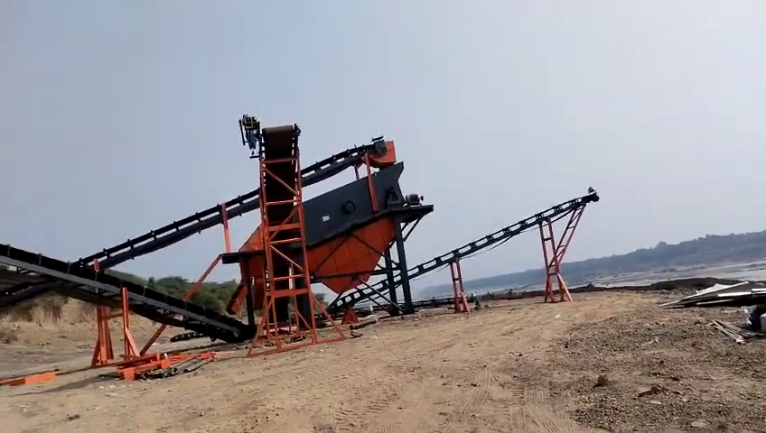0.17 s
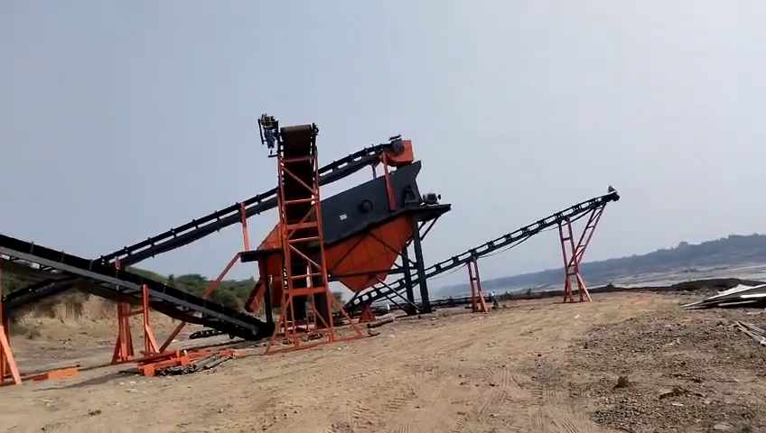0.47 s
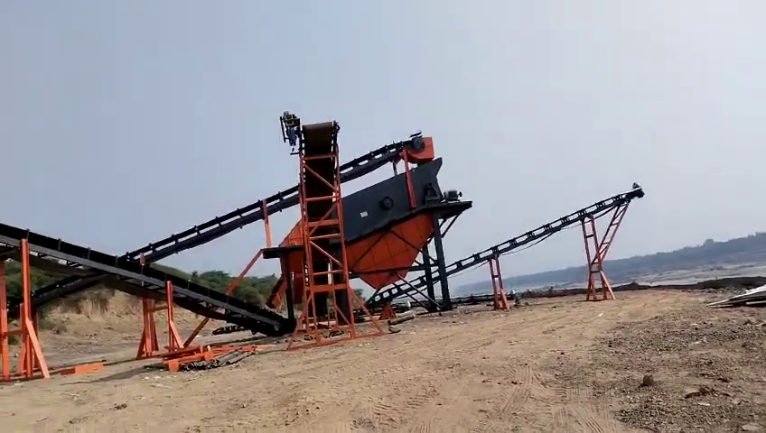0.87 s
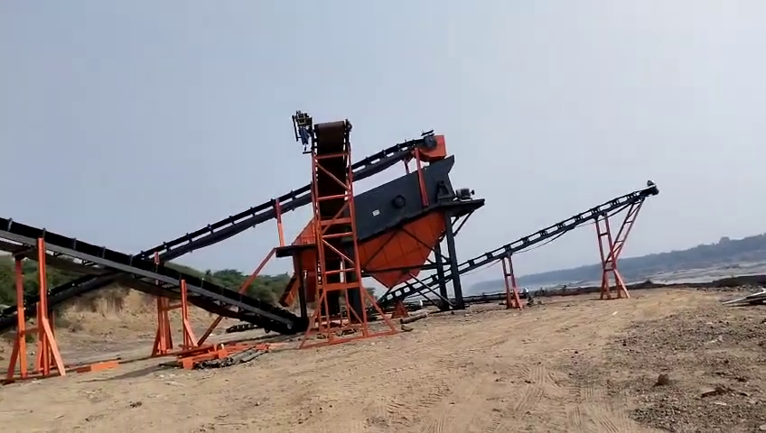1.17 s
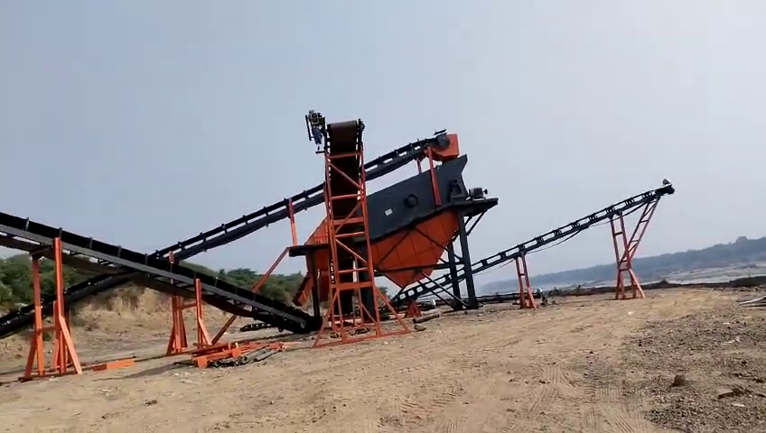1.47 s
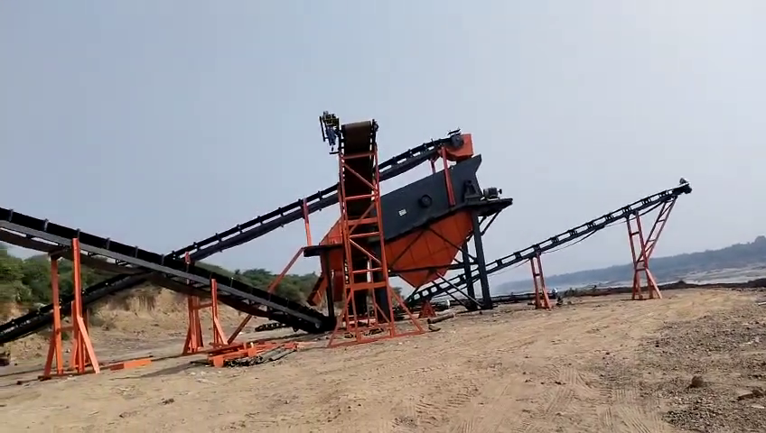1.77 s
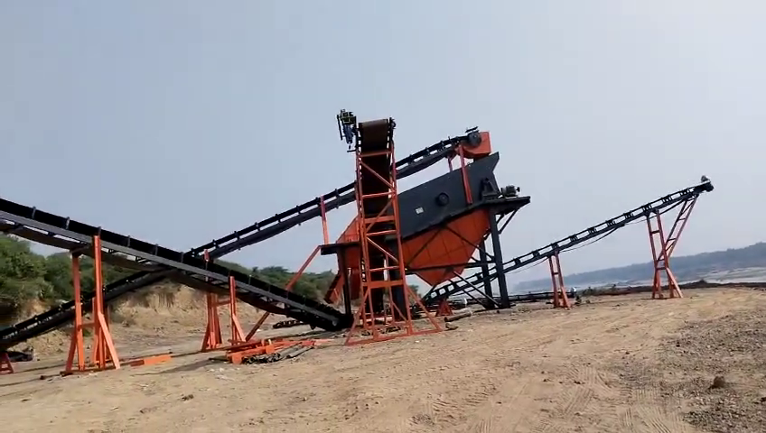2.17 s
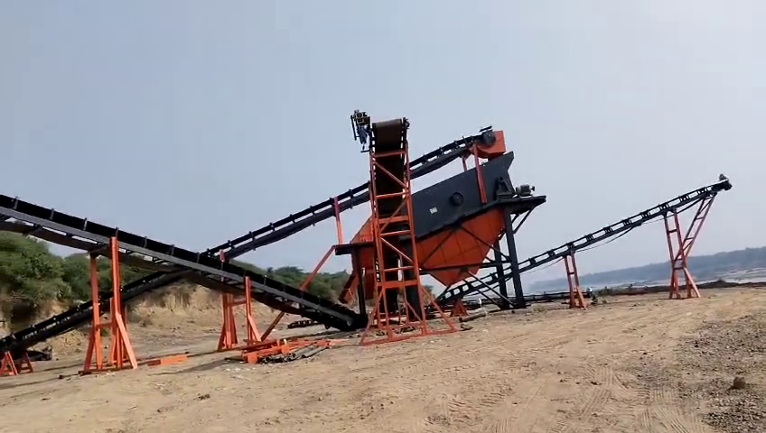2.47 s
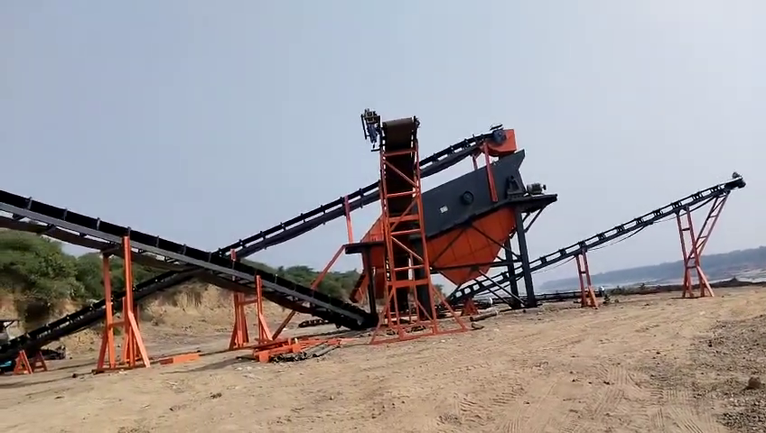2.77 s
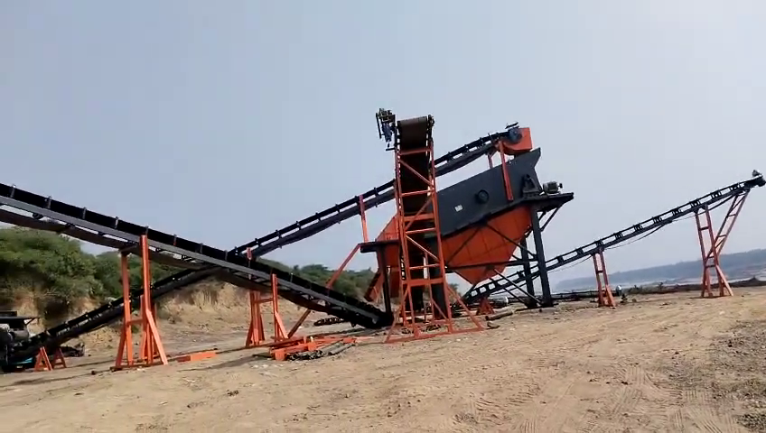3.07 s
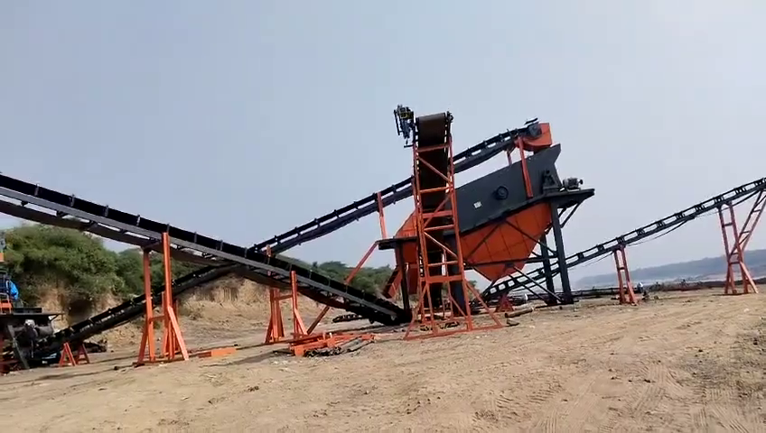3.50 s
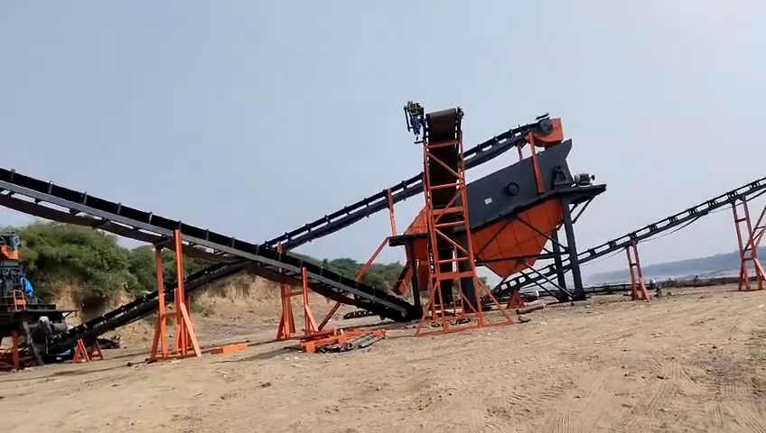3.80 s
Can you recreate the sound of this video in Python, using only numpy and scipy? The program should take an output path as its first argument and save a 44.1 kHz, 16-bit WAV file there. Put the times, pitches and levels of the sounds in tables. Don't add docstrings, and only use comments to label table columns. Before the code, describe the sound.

Steady mechanical roar of a quarry plant across open ground, two engines beating together, metal panels clattering and belts hissing; late on the diesel rises in pitch while a distant hum grows. Stereo handheld phone microphone.

```python
import sys
import numpy as np
from scipy import signal
from scipy.fft import rfft, irfft
from scipy.io import wavfile
from scipy.ndimage import uniform_filter1d

SR = 44100
rng = np.random.default_rng(int(sys.argv[2]) if len(sys.argv) > 2 else 0)


def to_linear_factor(level_db):
    exponent = np.asarray(level_db, float) / 20
    return 10 ** exponent


def bounce(signal):
    frames = np.transpose(np.atleast_2d(signal))
    limited = np.clip(frames, -1, 1)
    pcm = np.round(limited * 32767).astype(np.int16)
    wavfile.write(sys.argv[1], SR, pcm)


N = 173754
T, HZ = np.arange(N) / SR, np.arange(N // 2 + 1) * SR / N
GENERATOR_HZ = 23.655


def table(rows, hz, col=1):
    rows = np.array(rows, float)
    return np.interp(np.log(hz + 1), np.log(rows[:, 0]), rows[:, col])


def walk(rate_hz):
    hold = int(SR / rate_hz)
    steps = np.repeat(rng.standard_normal(N // hold + 1), hold)
    return 1.27 * uniform_filter1d(uniform_filter1d(steps, hold), hold)[:N]


def bandpass(x, order, low_hz, high_hz):
    return signal.sosfilt(signal.butter(order, [low_hz, high_hz], "band", fs=SR, output="sos"), x)


def colour(x, rows, gain=1):
    return irfft(rfft(x) * to_linear_factor(table(rows, HZ)) * np.sqrt(SR / 2) * gain, N)


def line(phase_rad, level_db):
    level = to_linear_factor(level_db + 0.9 * walk(6.08))
    return np.sqrt(2) * level * np.cos(phase_rad + 0.12 * walk(5.25))


def strike(t, rise_s, decay_s):
    return np.exp(-t / decay_s) * (1 - np.exp(-t / rise_s))


def wind():
    x = bandpass(rng.standard_normal((2, N)), 3, 36, 75)
    return to_linear_factor(-44 + 1.7 * walk(4.3)) * x / x.std()


# freq_hz, density_db_per_hz
RUMBLE_SPECTRUM = [(20, -75), (40, -61), (100, -57), (180, -57), (200, -63), (330, -64), (450, -72),
                   (700, -85)]


def ground_rumble():
    return colour(rng.standard_normal(N), RUMBLE_SPECTRUM)


# freq_hz, early_db, late_db
FAR_DRIVE_LINES = [(38.9, -46, -44), (78.5, -49, -41), (129.9, -52, -43), (233.5, -62, -42)]


def far_drive():
    late = T / T[-1]
    return sum(line(2 * np.pi * hz * T, early_db + (late_db - early_db) * late)
               for hz, early_db, late_db in FAR_DRIVE_LINES)


GENERATOR_MULTIPLES = [1, 2, 3, 4, 5, 6, 10, 13]
GENERATOR_LEVELS = [-58, -35, -37.5, -44.5, -48, -43, -56, -52]


def generator():
    turns = GENERATOR_HZ * T + 0.19
    return sum(line(2 * np.pi * k * turns, level_db)
               for k, level_db in zip(GENERATOR_MULTIPLES, GENERATOR_LEVELS))


GENERATOR_RATTLE_LAG_TURNS = -0.05


def pings():
    low_hz, high_hz, decay_s = 1876, 4220, 0.017
    out, t = np.zeros(N + 4096), T[:4096]
    for k, (pitch, strength, delay) in enumerate(rng.random((270, 3))):
        start_s = (k // 3 - GENERATOR_RATTLE_LAG_TURNS) / GENERATOR_HZ + 0.012 * delay
        i = int(start_s * SR)
        hz = low_hz * (high_hz / low_hz) ** pitch
        ring = np.sin(2 * np.pi * hz * t) * strike(t, 0.002, decay_s)
        out[i:i + len(t)] += to_linear_factor(-45 + 9.6 * strength) * ring
    return out[:N]


# start_s, level_db, pitch_hz, decay_s
CHUTE_STONES = [
    (.725, -28.5, 1200, .04),
    (.735, -35, 500, 0.045),
    (1.943, -26, 1400, 0.025),
    (1.95, -31, 480, 0.07),
    (2.5, -32, 91, .08),
    (.87, -36.5, 480, 0.07),
    (3.27, -33.5, 1100, 0.049),
    (3, -38, 300, .05),
    (2.76, -37, 220, .1),
    (1.75, -36, 180, .12),
]


def stones():
    out, t = np.zeros(N), T[:16384]
    for start_s, level_db, hz, decay_s in CHUTE_STONES:
        blow = rng.standard_normal(len(t)) * strike(t, 0.0051, decay_s)
        ring = bandpass(blow, 2, hz / 2.1, hz * 1.98)
        out[int(start_s * SR):][:len(t)] += to_linear_factor(level_db) * ring / ring[:int(decay_s * SR)].std()
    return out


# start_s, peak_db, pitch_hz
PANEL_SLAPS = [(0.0448, -19, 2470), (0.0872, -16, 3100), (0.1351, -27, 3570), (0.179, -9, 3510),
               (0.2199, -22, 2340), (0.2673, -16, 2600), (0.3571, -18, 2510), (0.377, -8, 2000),
               (0.4239, -23, 3550), (0.4459, -19, 2640), (0.4668, -19, 2650), (0.5152, -21, 2630),
               (0.7198, -20, 2600), (0.7901, -13, 3510), (0.8106, -12, 3720), (0.8799, -17, 3600),
               (1.037, -21, 2440), (1.0605, -7, 2370), (1.1263, -23, 2130), (1.1523, -23, 3120),
               (1.1942, -24, 2170), (1.2211, -19, 2440), (1.266, -7, 3610), (1.3139, -11, 2310),
               (1.3568, -6, 2500), (1.3992, -22, 2390), (1.4865, -16, 2520), (1.514, -13, 2450),
               (1.6008, -12, 3510), (1.6232, -12, 2660), (1.694, -20, 2210), (1.7365, -20, 2320),
               (1.7853, -23, 2680), (1.8986, -18, 2320), (1.943, -22, 2570), (2.0333, -22, 2670),
               (2.0812, -21, 2350), (2.1211, -22, 2440), (2.166, -11, 2470), (2.2792, -20, 2140),
               (2.4134, -24, 2310), (2.5775, -9, 2420), (2.6668, -17, 2010), (2.7067, -16, 1950),
               (2.7501, -16, 2400), (2.834, -17, 2470), (2.8749, -18, 2350), (2.9133, -21, 2100),
               (3.0525, -22, 2470), (3.1727, -24, 2230), (3.2934, -22, 1900), (3.3318, -19, 2060),
               (3.4376, -20, 2350), (3.5967, -21, 2040), (3.7643, -25, 2440), (3.8457, -20, 2200)]


def slaps():
    level_db, decay_s, spread, hiss_db = -8.5, 0.011, 0.05, -9
    out, t = np.zeros(N + 4096), T[:4096]
    detune = rng.standard_normal((len(PANEL_SLAPS), 3))
    for (start_s, peak_db, hz), u in zip(PANEL_SLAPS, detune):
        ratios = [1, 1 + spread * u[1], 1 + 3 * spread * u[2]]
        ring = np.sin(2 * np.pi * hz * np.outer(ratios, t)).mean(axis=0)
        hiss = to_linear_factor(hiss_db) * 2 * bandpass(rng.standard_normal(len(t)), 2, 1700, 4600)
        slap = (ring + hiss) * strike(t, 0.0018, decay_s)
        out[int(start_s * SR):][:len(t)] += to_linear_factor(peak_db + level_db) * slap
    return out[:N]


def bursts(turns, rate_hz, decay_s, shared):
    strength = to_linear_factor(1.4 * rng.standard_normal(512) + 0.7 * shared)
    since_s = (turns % 1) / rate_hz
    env = strength[np.floor(turns).astype(int) + 2] * np.exp(-since_s / decay_s)
    env = uniform_filter1d(env, size=330)
    return env / np.sqrt(np.mean(env ** 2))


# start_s, rattle_db, sliding_sand_hiss_db
PLANT_EFFORT = [(0, -1.5, -0.5), (.3, -.5, -1), (.5, 0, 0.5), (.7, -.5, 1.5), (.95, -1, 3), (1.1, -1, 0),
                (1.5, 0, -1), (2, .5, -0.5), (2.35, 0, .5), (2.6, 0, -0.5), (2.8, 1, 2), (3.05, 0, -1),
                (3.4, 0.5, -1), (3.7, -1.5, 0), (3.94, 1.5, 0.5)]
# low_hz, high_hz, diesel_db, generator_db, belts_db
RATTLE_REGISTERS = [(197, 773, -3, -7, 0.5), (800, 1840, -9, -5, -7.5), (1732, 2770, -3.5, -3, -4.5),
                    (2950, 4570, -1.5, -2.5, -7), (5050, 8930, -0.5, -18, -1.5), (9200, 15000, -3.5, 0, -3)]


def shaking(turns, firing_hz):
    diesel_shared, generator_shared = rng.standard_normal((2, 512))
    start_s, effort_db, hiss_db = np.array(PLANT_EFFORT).T
    generator_turns = GENERATOR_HZ * T + GENERATOR_RATTLE_LAG_TURNS
    envs = []
    for k, (_, _, diesel_db, generator_db, belts_db) in enumerate(RATTLE_REGISTERS):
        diesel = to_linear_factor(diesel_db) * bursts(turns + 0.2, firing_hz, 0.017, diesel_shared)
        gen = to_linear_factor(generator_db) * bursts(generator_turns, GENERATOR_HZ, 0.027, generator_shared)
        belts = to_linear_factor(belts_db + 1.4 * walk(11))
        effort = to_linear_factor(np.interp(T, start_s, effort_db + (k > 3) * hiss_db))
        envs.append(effort * np.sqrt(diesel ** 2 + gen ** 2 + belts ** 2))
    return envs


# freq_hz, width_hz, first_lift_db, last_lift_db
PANEL_MODES = [(538, 10, 6.5, 1.5), (595, 9.6, 4.5, 9), (792, 52, 8, 8.5), (953, 20, 8, 5),
               (1255, 24, 5, 4), (2200, 82, 0, -0.5), (2507, 62, 4, -0.5), (2640, 60, 3.5, -3),
               (3500, 76, 4.5, -11), (4320, 140, 2, 2), (6870, 520, 5.5, 8.5), (9570, 700, 10, -2)]


def panel_response(col):
    return 1 + sum((to_linear_factor(p[col]) - 1) / (1 + 1j * (HZ / p[0] - p[0] / (HZ + 1)) * p[0] / p[1])
                   for p in PANEL_MODES)


# freq_hz, density_db_per_hz
FIRST_ROAR = [(300, -86.5), (600, -73), (1300, -63.5), (1700, -64), (2400, -60), (3600, -61.5), (5200, -72),
              (15500, -93)]
# freq_hz, density_db_per_hz
LAST_ROAR = [(300, -66.5), (600, -76.5), (1300, -63), (1700, -61.5), (2400, -58.5), (3600, -70),
             (5200, -79), (15500, -92.5)]


def roar(envs):
    drive = sum(bandpass(env * rng.standard_normal(N), 2, *register[:2])
                for register, env in zip(RATTLE_REGISTERS, envs))
    turn = (T / T[-1]) ** 0.83
    first = colour(drive, FIRST_ROAR, panel_response(2))
    last = colour(drive, LAST_ROAR, panel_response(3))
    return (1 - turn) * first + turn * last


# start_s, firing_hz, load_0_to_1, exhaust_db
DIESEL_COURSE = [(0, 44.5, 0, 0), (.35, 44.6, 0, 0), (.55, 43.8, 0, 0), (.8, 44.1, 0, 0),
                 (1.1, 43.9, 0, -2), (1.3, 44.4, 0, -2), (2.0, 44.3, 0, -3), (2.6, 44.3, .1, -3),
                 (2.7, 45.6, .7, 2), (2.8, 47.7, .8, 2), (2.9, 49.6, .9, 1), (3.0, 50.2, 1, 0),
                 (3.2, 50.1, 1, 0), (3.5, 50.6, 1, -1), (3.94, 51.4, 1, -4)]


def diesel_course():
    course = np.array(DIESEL_COURSE)
    firing_hz, load, level_db = (np.interp(T, course[:, 0], c) for c in course.T[1:])
    turns = np.cumsum(firing_hz) / SR - 0.14
    return turns, firing_hz, load, level_db


EXHAUST_MULTIPLES = list(range(4, 17)) + [18, 20]
# idle_db, loaded_db
EXHAUST_LEVELS = [(-28, -34), (-46, -50), (-45, -48), (-42, -38), (-30, -23.5), (-41, -50), (-38, -40),
                  (-42, -47), (-36, -32.5), (-41, -37), (-37, -43), (-38, -52), (-36, -52), (-57, -57),
                  (-45, -52)]


def diesel_exhaust(turns, firing_hz, load, level_db):
    cylinders, pipe_hz, pipe_width_hz, pipe_db = 4, 48.2, 1.4, 9
    shade_db = 7 * np.clip(2 - T / 0.18, 0, 1)
    out = np.zeros(N)
    for k, (idle_db, loaded_db) in zip(EXHAUST_MULTIPLES, EXHAUST_LEVELS):
        phase_rad = np.pi * max(k - 2 * cylinders, 0) ** 2 / 9
        if k % cylinders > 0:
            phase_rad = phase_rad + 2 * np.pi * rng.random() + 0.5 * walk(3)
        detune = (firing_hz * k / cylinders - pipe_hz) / pipe_width_hz
        db = idle_db - 1 + (loaded_db - idle_db) * load + level_db
        db = db - (k > 12) * shade_db + pipe_db / (1 + detune ** 2)
        out += line(2 * np.pi * turns * k / cylinders + phase_rad, db)
    return out


# freq_hz, level_db, lead_rad, likeness_0_to_1
RIGHT_PORT = [(100, .8, .22, .8), (185, -.2, .42, .85), (300, -6.5, 1.0, .8), (650, -3.2, 1.9, .9),
              (1500, -6.5, 2.5, .83), (2300, -11, .9, .85), (4000, -9.5, 0, .7), (7500, -12.5, -2.8, .45),
              (15000, -11, -6, .2)]


def right_port(tones, left, other):
    like = np.clip(table(RIGHT_PORT, HZ, col=3), 0, 1)
    shade = to_linear_factor(table(RIGHT_PORT, HZ)) * np.exp(1j * table(RIGHT_PORT, HZ, col=2))
    noise = like * rfft(left) + np.sqrt(1 - like ** 2) * rfft(other)
    return irfft(shade * (rfft(tones) + noise), N)


def scene():
    turns, firing_hz, load, level_db = diesel_course()
    envs = shaking(turns, firing_hz)
    tones = far_drive() + generator() + diesel_exhaust(turns, firing_hz, load, level_db)
    left = ground_rumble() + pings() + stones() + slaps() + roar(envs)
    other = ground_rumble() + roar(envs)
    ports = np.array([left + tones, right_port(tones, left, other)])
    return (ports + wind()) * np.clip(0.93 + T / 0.068, 0, 1)


def low_pass(x):
    return signal.sosfilt(signal.butter(12, 15520, fs=SR, output="sos"), x)


def record(dry):
    dulled = signal.sosfilt(signal.butter(2, 11900, fs=SR, output="sos"), dry)
    return low_pass(dulled)


dry = scene()
out = record(dry)
bounce(out)
```